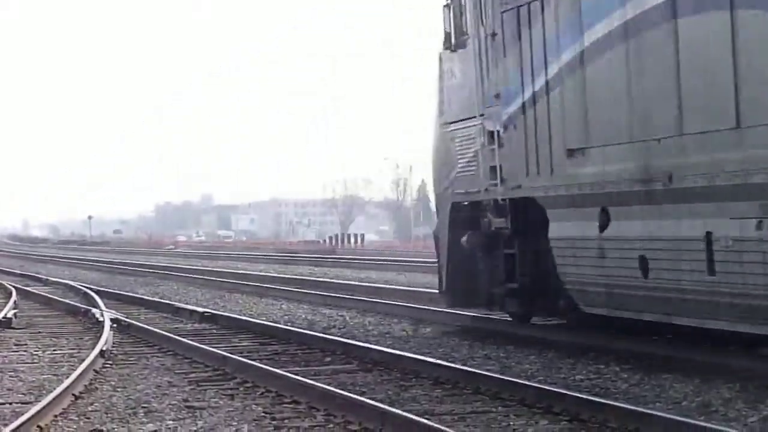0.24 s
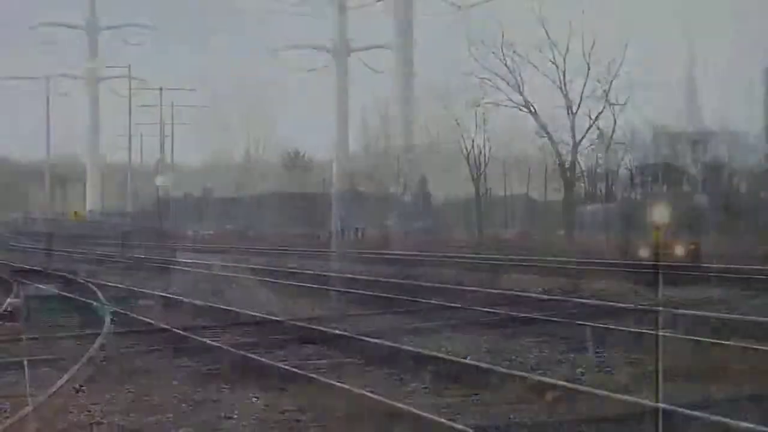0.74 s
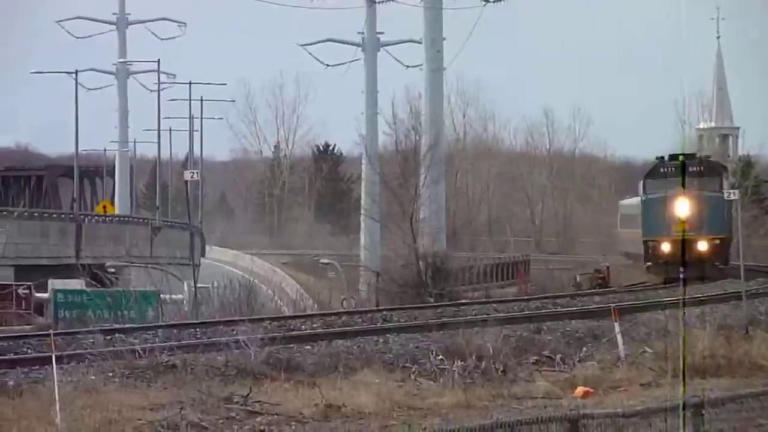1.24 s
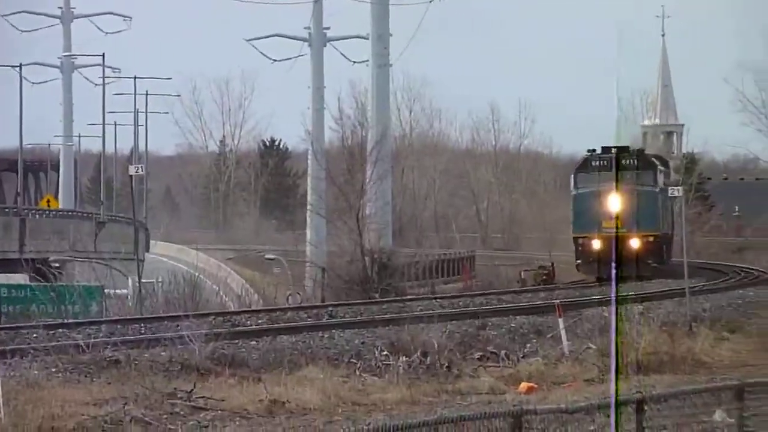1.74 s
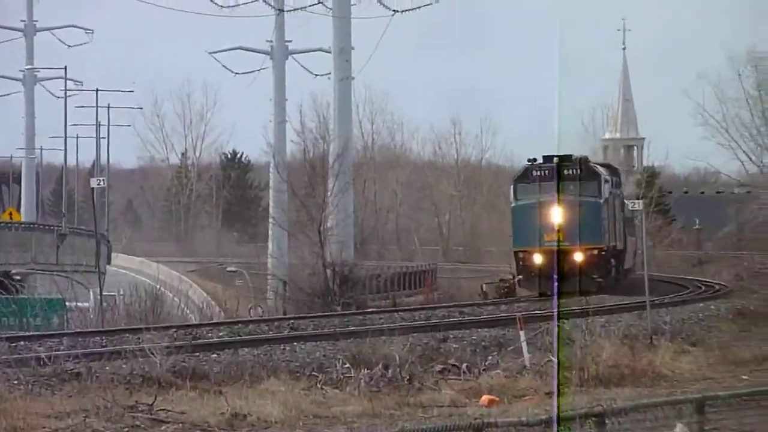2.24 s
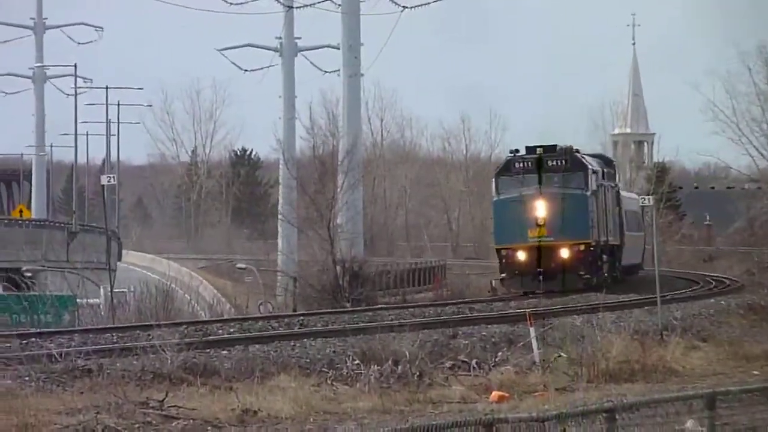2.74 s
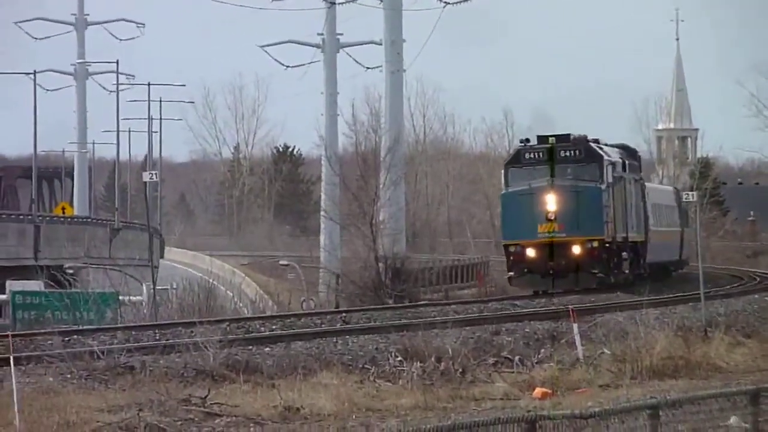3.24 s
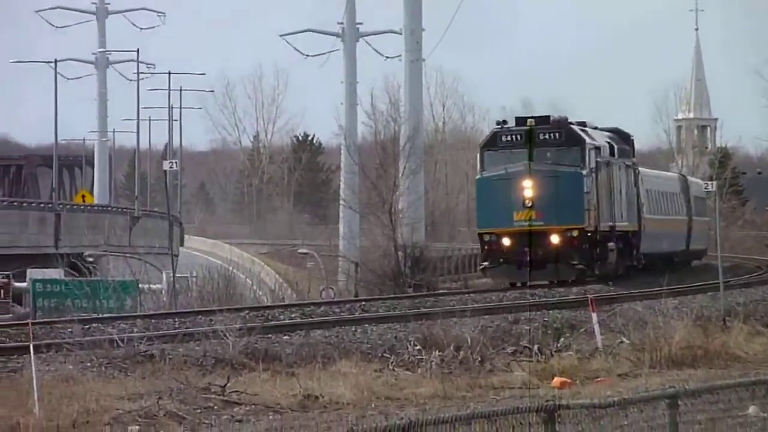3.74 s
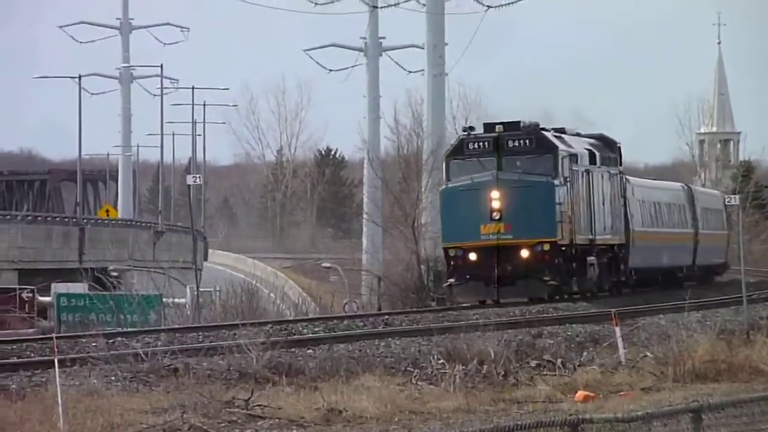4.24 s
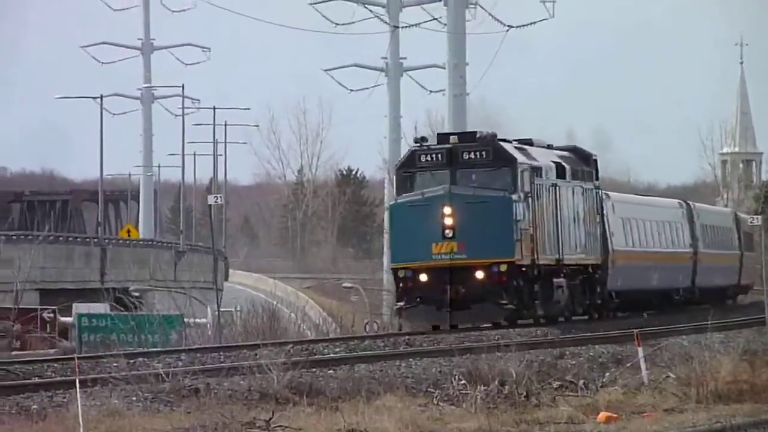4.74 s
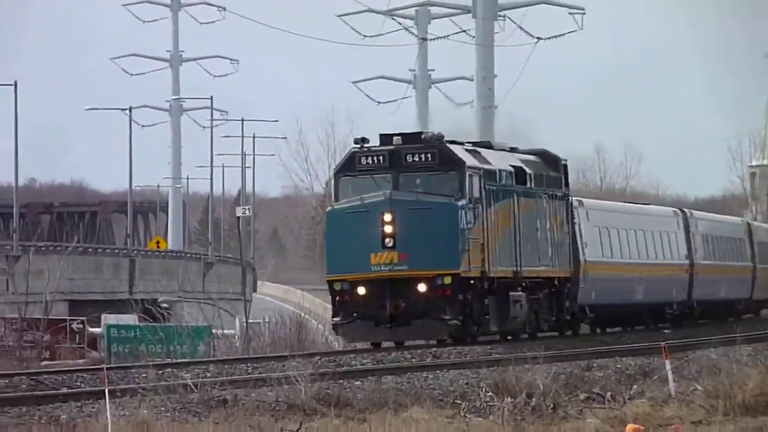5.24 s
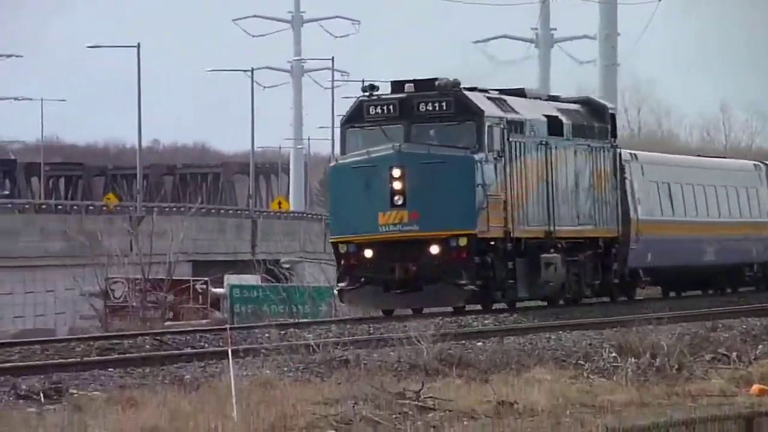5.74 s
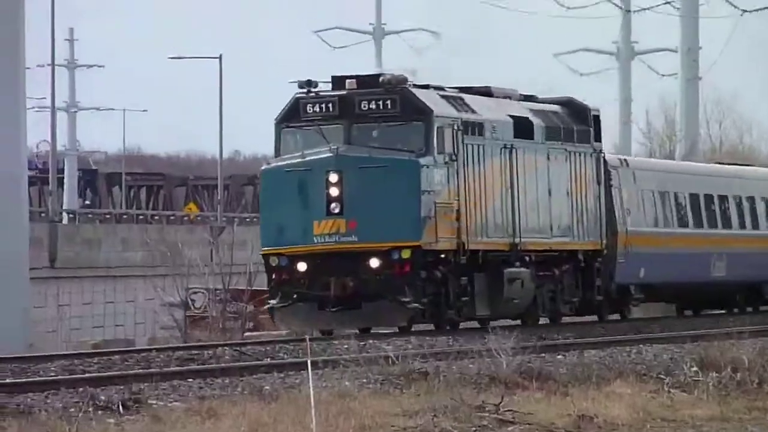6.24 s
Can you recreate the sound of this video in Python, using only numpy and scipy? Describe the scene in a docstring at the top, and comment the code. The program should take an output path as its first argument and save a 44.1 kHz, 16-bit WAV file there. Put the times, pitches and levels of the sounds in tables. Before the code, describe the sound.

A diesel locomotive rumbles past close by with a thin, slightly sinking whistle. After a second the sound cuts to a quieter, distant passenger train, its wheels rolling and its engine throbbing. A hollow, fluttering whine starts just before the cut and stays prominent. Outdoors, low gusts buffet the microphone, and several sharp close knocks in the second half briefly duck the train. Everything sounds dull and narrow over faint hiss.

```python
"""Two trains, near and far

A diesel locomotive rumbles past close by, its turbocharger whistle sinking. After a second we cut to a
passenger train rounding a far curve: throbbing exhaust, rolling wheels, gusts on the microphone. A
hollow, fluttering whine of resonant noise carries across the cut. Close knocks duck a limiter and the
trains creep back up. Everything is heard through a narrow band, over a faint hiss."""
import sys
import numpy as np
from scipy import signal
from scipy.fft import rfft, irfft, next_fast_len
from scipy.io import wavfile
from scipy.ndimage import uniform_filter1d

SR = 44100
rng = np.random.default_rng(int(sys.argv[2]) if len(sys.argv) > 2 else 0)


def log_audio(samples):
    """Write samples as a 16-bit WAV file to the path given in sys.argv[1]."""
    # one column per channel
    frames = np.atleast_2d(samples).T
    # limit to full scale, then quantise
    limited = np.clip(frames, -1, 1)
    pcm = np.round(limited * 32767).astype(np.int16)
    wavfile.write(sys.argv[1], SR, pcm)


N = 287091
TIME = np.arange(N) / SR
CUT_S, BAND_EDGE_HZ = 0.996, 3620

# Tone of the close wheels. Each row: frequency in Hz, relative level in dB.
NEAR_COLOUR = [(20, -11.5), (38, -20), (55, -2.5), (120, -4.5), (250, 1.5), (430, -5.5), (600, -4.5),
               (850, -9.5), (1200, -14), (1700, -21.5), (1950, -23.5), (2300, -27.5), (3300, -32.5)]
# Surges and sags as the wheels roll by. Each row: centre in seconds, level change in dB, length in seconds.
WHEEL_SURGES = [(0.51, 3, 0.068), (0.58, -3, 0.14), (0.67, 2, 0.06), (0.94, 3, 0.24)]
# The turbo whistle sinks as it passes. Each row: time in seconds, pitch in Hz.
TURBO_PITCH = [(0, 1537), (.3, 1532), (.55, 1530), (.72, 1520), (.86, 1498), (1, 1450)]
# The whistle fades as it turns away, then firms up. Each row: time in seconds, level in dB.
TURBO_LEVEL = [(0, -24), (.15, -21.5), (.7, -30.5), (.92, -25.5), (1, -24.5)]
# The whine's hollow resonance, before it drifts. Each row: frequency in Hz, relative level in dB.
WHINE_COLOUR = [(500, -43), (570, -16), (620, -11.5), (650, 0.5), (678, 1), (702, 1), (728, -3.5),
                (755, -17), (795, -23.5), (860, -51)]
# Fader ride on the whine. Each row: time in seconds, relative level in dB.
WHINE_LEVEL = [(0.5, -27), (0.78, -20), (1.12, -30.5), (1.22, -22), (1.7, -29), (1.8, -22), (2.14, -27),
               (2.48, -20.8), (2.58, -26.5), (3.9, -25.5), (4.0, -33), (4.16, -20.5), (4.44, -27),
               (5.2, -25.5), (5.4, -21.3), (5.56, -31.5), (6.16, -21.8), (6.5, -26)]
# The whine's strongest throbs. Each row: crest in seconds, peak in dB, length in seconds.
WHINE_THROBS = [(0.661, -13, 0.028), (0.898, -12.5, 0.049), (1.051, -11.5, 0.037), (1.261, -11, 0.022),
                (1.333, -10.5, 0.023), (2.031, -12, 0.029), (2.491, -11.5, 0.019), (2.9, -11, 0.026),
                (3.538, -11, 0.015), (4.266, -13.5, .038), (4.42, -9, 0.022), (4.64, -12, 0.018),
                (5.392, -13, 0.028), (5.82, -9.5, 0.024), (6.173, -12.5, 0.034)]
# Tone of the far wheels. Each row: frequency in Hz, relative level in dB.
FAR_COLOUR = [(30, -20), (110, -7), (190, -8), (255, -1.5), (340, -5), (450, -1.5), (560, -1), (780, -4.5),
              (890, -0.5), (1000, -7.5), (1120, -9.5), (1340, -20), (1700, -23), (2200, -37), (3500, -41.5)]
# Fader ride on the far wheels. Each row: time in seconds, relative level in dB.
ROLLING_LEVEL = [(1.0, -36), (2.18, -33), (3.1, -34.5), (3.92, -37), (4.26, -37.5), (4.8, -37),
                 (4.88, -38.5), (6.5, -37.5)]
# The rails roar up in the curve. Each row: crest in seconds, lift of the roar in dB, length in seconds.
RAIL_SWELLS = [(2.28, 5, .12), (2.52, 1.5, .3), (4.27, 9.5, .22), (4.63, 5.5, 0.2), (5.28, 9, 0.24),
               (6.08, 6.5, 0.26)]
# The faint ring above the whine. Each row: frequency in Hz, relative level in dB.
RING_COLOUR = [(1060, -31.5), (1120, -16), (1160, -2.5), (1200, -0.5), (1235, -4), (1275, -16), (1350, -36)]
# Fader ride on that ring. Each row: time in seconds, level in dB.
RING_LEVEL = [(1, -42.5), (1.35, -42.5), (1.65, -50), (1.95, -40.5), (2.55, -39.5), (4.4, -47.5),
              (5.6, -49.5), (6.0, -45.5), (6.5, -47.5)]
# Partials of the far exhaust. Each row: multiple of the crankshaft speed, relative level in dB.
EXHAUST_ORDERS = [(4, -22), (5, -9.5), (6, -9.5), (7, -22), (8, 5.5), (9, -5.5), (9.45, -2), (11, -16.5),
                  (14, -17)]
# Fader ride on the exhaust. Each row: time in seconds, relative level in dB.
EXHAUST_LEVEL = [(1.0, -42.5), (2.32, -39.5), (2.9, -33.5), (3.44, -42), (4.06, -36), (5.12, -39.5),
                 (6.12, -33), (6.5, -36)]
# Boom of wind on the microphone. Each row: frequency in Hz, relative level in dB.
WIND_COLOUR = [(8, -29.5), (20, -11), (35, -11), (55, -3), (100, -6), (160, -11), (400, -49)]
# Gusts. Each row: crest in seconds, lift in dB, length in seconds.
GUSTS = [(1.33, 5, 0.63), (2.08, 11.5, .7), (3.05, 7, .9), (3.65, 14, .2), (5.7, 7, .6), (6.23, 13.5, 0.22)]
# Close knocks. Each row: time in seconds, level in dB, brightness in Hz, ring and scuff in dB against
# the thump, scuff's 60 dB decay in seconds, room for chatter before the blow in seconds.
KNOCKS = [(3.549, -2, 1540, 0, -21.5, .03, 0.0032), (3.679, -6, 700, -21, -14, .03, .008),
          (3.6915, -1, 1450, -8, -13.5, .08, 0.0011), (3.7075, 4.5, 1400, -1, -10, .03, .012),
          (4.8256, -7.5, 1020, 1, -19, 0.18, .004), (4.896, -23, 1360, 1.5, -17.5, .04, 0.0039),
          (5.263, -24.5, 1396, 6.5, -6.5, 0.062, 0), (6.242, -11.5, 486, -3, -19.5, .035, 0.0058)]
# Modes of the knocked body. Each row: frequency in Hz, relative level in dB, 60 dB decay in seconds.
BODY_MODES = [(326, -6.5, 0.018), (673, -0.5, 0.018), (922, -7.5, 0.045), (1210, -6, 0.025),
              (1610, -7.5, 0.01), (1940, -13, 0.019), (2680, -14, 0.018)]
# Grit of a knock's scuff. Each row: frequency in Hz, relative level in dB.
SCUFF_COLOUR = [(100, -4), (600, -3.5), (1200, 4), (2000, -12), (3400, -19.5), (4500, -36.5)]
# The hiss floor. Each row: frequency in Hz, relative level in dB.
HISS_COLOUR = [(100, -3.5), (2200, -2.5), (2800, 1.5), (3400, 3.5), (4000, -0.5), (4500, -54)]


def gain_of(db):
    """Decibels as a gain."""
    return 10 ** (np.asarray(db) / 20)


def unit_rms(x):
    """The signal scaled to an rms of 1."""
    return x / np.sqrt(np.mean(x ** 2) + 1e-20)


def ride(rows):
    """An automation line through (seconds, value) points."""
    return np.interp(TIME, *np.transpose(rows))


def swells(rows):
    """Smooth rises and dips in dB, one for each row."""
    return sum(db * np.cos(np.pi * np.clip((TIME - s) / length, -.5, .5)) ** 2 for s, db, length in rows)


def noise(shape):
    """Noise of rms 1 whose amplitude spectrum is shape(Hz)."""
    size = next_fast_len(N)
    hz = np.fft.rfftfreq(size, 1 / SR)
    return unit_rms(irfft(rfft(rng.standard_normal(size)) * shape(hz), size)[:N])


def colour(points, hz):
    """Gain of an EQ curve, its points joined on a log-frequency axis."""
    point_hz, db = np.transpose(points)
    return gain_of(np.interp(np.log(hz + 1), np.log(point_hz), db))


def below(hz, edge_hz, order=4):
    """Gain of a smooth low-pass."""
    return 1 / np.sqrt(1 + (hz / edge_hz) ** (2 * order))


def waver(rate_hz):
    """A random wobble of rms 1, rolling off above the given rate."""
    return noise(lambda hz: below(hz, rate_hz, order=2))


def two_bands(points, split_hz):
    """The low and the high part of a coloured noise, each of rms 1."""
    low = noise(lambda hz: colour(points, hz) * below(hz, split_hz))
    high = noise(lambda hz: colour(points, hz) * np.sqrt(1 - below(hz, split_hz) ** 2)
                 * below(hz, BAND_EDGE_HZ, order=12))
    return low, high


def near_wheels(approach_db_per_s=4.5):
    """Rumble and wheel hiss, shaken by the running gear, build as the locomotive draws level."""
    rise_db = approach_db_per_s * TIME + swells(WHEEL_SURGES)
    rumble, hiss = two_bands(NEAR_COLOUR, split_hz=1530)
    shake_db = 1.2 * waver(rate_hz=24)
    return (rumble * gain_of(-24.5) + hiss * gain_of(-36)) * gain_of(rise_db + shake_db)


def turbocharger(beat_hz=7.34, null_s=0.606, echo_growth_per_s=0.76):
    """A sinking whistle; its echo off the ground beats against it ever more deeply."""
    pitch_hz = ride(TURBO_PITCH) * (1 + 0.0027 * waver(rate_hz=6.7))
    cycles = np.cumsum(pitch_hz) / SR
    echo_share = np.clip(echo_growth_per_s * TIME, 0, .6)
    echo = echo_share * np.sin(2 * np.pi * (cycles + beat_hz * (TIME - null_s)))
    whistle = np.sqrt(2) * (np.sin(2 * np.pi * cycles) - echo)
    return whistle * gain_of(ride(TURBO_LEVEL) + 1.3 * waver(rate_hz=38))


def whine(start_s=0.465, attack_s=.03, steadiness=0.27, throb_hz=692, spread_hz=14, flutter_db=1.5):
    """Noise in one narrow resonance: a hollow tone that flutters and now and then throbs."""
    tone = noise(lambda hz: colour(WHINE_COLOUR, hz))
    # the centre creeps upward and wanders
    shift_hz = 7 + 2.5 * (TIME - TIME.mean()) + 9 * waver(rate_hz=11.8)
    analytic = signal.hilbert(tone, next_fast_len(N))[:N]
    tone = (analytic * np.exp(2j * np.pi * np.cumsum(shift_hz) / SR)).real
    # gentle levelling over a tenth of a second leaves the fast flutter free
    power = uniform_filter1d(uniform_filter1d(tone ** 2, size=3000), size=2000)
    tone = unit_rms(tone / power ** (steadiness / 2))
    fade_in = np.clip((TIME - start_s) / attack_s, 0, 1)
    out = tone * fade_in * gain_of(ride(WHINE_LEVEL) + 0.15 + flutter_db * waver(rate_hz=13))
    # in a throb the resonance rings pure and takes over from the noise
    for s, db, length in WHINE_THROBS:
        detune, phase = rng.uniform(-1, 1, 2)
        swell = np.hanning(round(length * SR))
        span = round((s - length / 2) * SR) + np.arange(len(swell))
        pure = np.sin(2 * np.pi * (throb_hz + spread_hz * detune) * TIME[span] + np.pi * phase)
        out[span] = out[span] * (1 - np.sqrt(swell)) + gain_of(db) * swell * pure
    return out


def far_wheels():
    """Wheels on distant rails: rumble and roar swell together in lumps, the roar flickering faster."""
    rolling_db, swell_db = ride(ROLLING_LEVEL), swells(RAIL_SWELLS)
    rumble, roar = two_bands(FAR_COLOUR, split_hz=724)
    lumps, flicker = waver(rate_hz=20), waver(rate_hz=43)
    rumble_db = rolling_db + 0.18 * swell_db + 0.37 + 3.0 * lumps
    roar_db = rolling_db + swell_db - 4.5 + 1.9 * lumps + 2.5 * flicker
    return rumble * gain_of(rumble_db) + roar * gain_of(roar_db)


def upper_ring():
    """Noise in a second narrow resonance above the whine, sustained and faint."""
    ring = noise(lambda hz: colour(RING_COLOUR, hz))
    return ring * gain_of(ride(RING_LEVEL) + 2.0 * waver(rate_hz=20))


def far_exhaust(shaft_hz=10.17):
    """Low orders of the crankshaft line up once a turn: the diesel throbs about ten times a second."""
    turns = rng.random() + np.cumsum(shaft_hz * (1 + 0.009 * waver(rate_hz=4))) / SR
    partials = sum(gain_of(db + 1.5 * waver(rate_hz=3.5)) * np.cos(2 * np.pi * order * turns)
                   for order, db in EXHAUST_ORDERS)
    return unit_rms(partials) * gain_of(ride(EXHAUST_LEVEL) + 2.07)


def wind(breeze_db=-41.5, fade_db_per_s=1.5):
    """A dying breeze buffets the microphone in low, lumpy gusts."""
    level_db = breeze_db - fade_db_per_s * TIME + swells(GUSTS)
    return noise(lambda hz: colour(WIND_COLOUR, hz)) * gain_of(level_db + 2.9 * waver(rate_hz=48))


def contacts(gap_s=0.00343, jitter=.05, rise_db=2.5):
    """Every touch of the knocks: some chatter into the blow, each contact harder than the last."""
    for s, db, *timbre, chatter_s in KNOCKS:
        yield s, db, *timbre
        for k in range(1, 1 + int(chatter_s / gap_s)):
            early_s = gap_s * (k + jitter * rng.standard_normal())
            yield s - early_s, db - rise_db * k, *timbre


def knocks(lead_s=.002):
    """Each contact is a short thump of pressure that sets the body ringing, with a scuff of noise."""
    t = np.arange(8000) / SR
    since_hit = t - lead_s
    body = sum(gain_of(db - 60 * t / t60) * np.sin(2 * np.pi * hz * t) for hz, db, t60 in BODY_MODES)
    grit = noise(lambda hz: colour(SCUFF_COLOUR, hz))
    out = np.zeros(N)
    for s, db, bright_hz, ring_db, scuff_db, scuff_t60 in contacts():
        span = round((s - lead_s) * SR) + np.arange(len(t))
        pulse_time = np.pi * bright_hz * since_hit
        thump = (2 * pulse_time ** 2 - 1) * np.exp(-pulse_time ** 2)
        ring = signal.fftconvolve(thump, body)[:len(t)]
        scuff = grit[span] * (since_hit > 0) * gain_of(scuff_db - 60 * since_hit / scuff_t60)
        out[span] += gain_of(db) * (thump + gain_of(ring_db) * ring / abs(ring).max() + scuff)
    return out


def limiter(x, threshold_db=-7.0, recovery_db_per_s=11, attack_s=0.0012):
    """Peaks over the threshold duck the gain fast; it creeps back up."""
    over_db = np.maximum(20 * np.log10(abs(x) + 1e-9) - threshold_db, 0)
    recovery_db = TIME * recovery_db_per_s
    held_db = np.maximum.accumulate(over_db + recovery_db) - recovery_db
    pole = np.exp(-1 / (attack_s * SR))
    return x * gain_of(-signal.lfilter([1 - pole], [1, -pole], held_db))


def low_pass(x, edge_hz):
    """A steep top cut."""
    return signal.oaconvolve(x, signal.firwin(441, edge_hz, window=("kaiser", 9), fs=SR), "same")


def scene():
    """A hard cut from the close locomotive to the far train, with the whine and knocks laid on top."""
    cut = np.clip((TIME - CUT_S) * 1000, 0, 1)  # a one-millisecond crossfade
    far = far_wheels() + upper_ring() + far_exhaust() + wind()
    near = near_wheels() + turbocharger()
    return ((1 - cut) * near + cut * far + whine() + knocks())[None]


def record(dry, ceiling=.88, hiss_db=-51, tick_db=-16, tick_decay_s=0.00028):
    """Limiter, overload ceiling, hiss and a narrow band; one faint, brighter tick marks the cut."""
    sound = np.clip(limiter(dry[0]), -ceiling, ceiling)
    sound += gain_of(hiss_db) * noise(lambda hz: colour(HISS_COLOUR, hz))
    since_cut = TIME - CUT_S
    tick = gain_of(tick_db) * (since_cut >= 0) * np.exp(-abs(since_cut) / tick_decay_s)
    return low_pass(low_pass(sound, BAND_EDGE_HZ) + tick, edge_hz=15800)[None]


dry = scene()
out = record(dry)
log_audio(out)
```